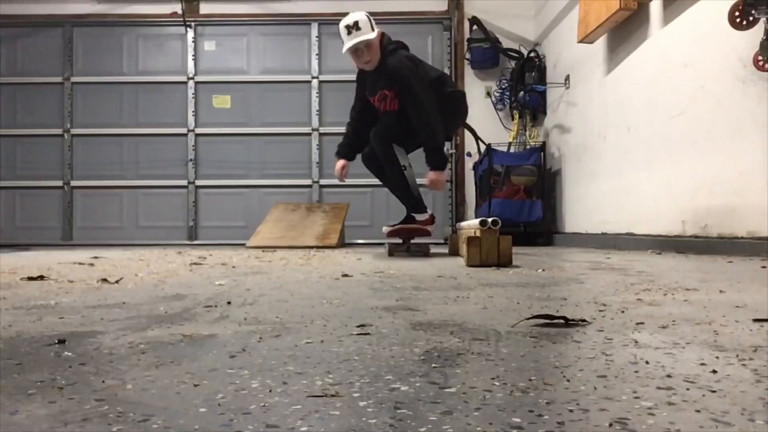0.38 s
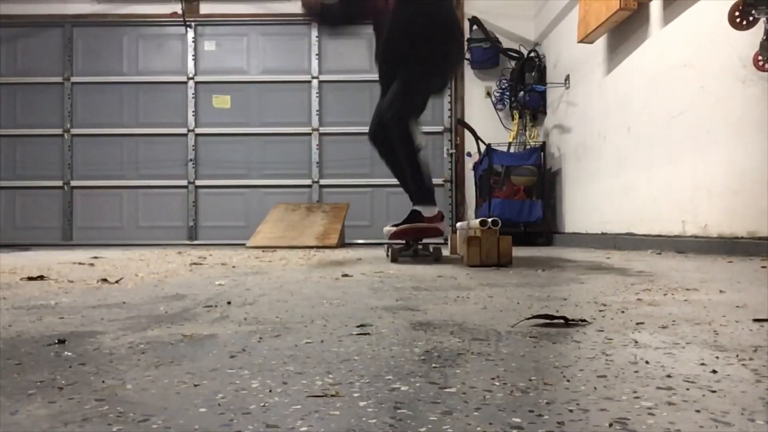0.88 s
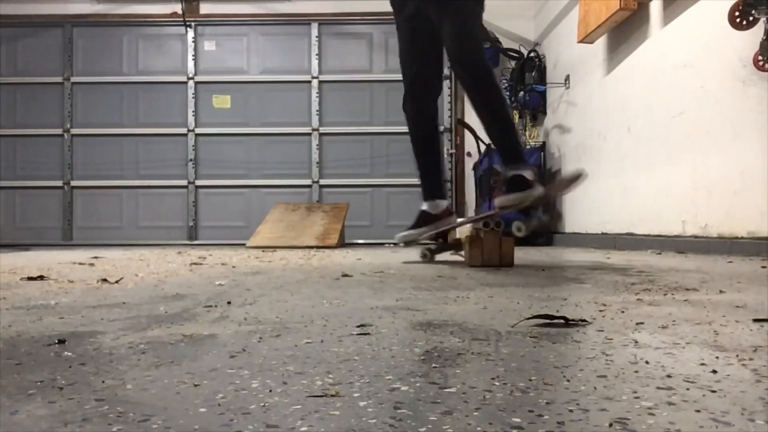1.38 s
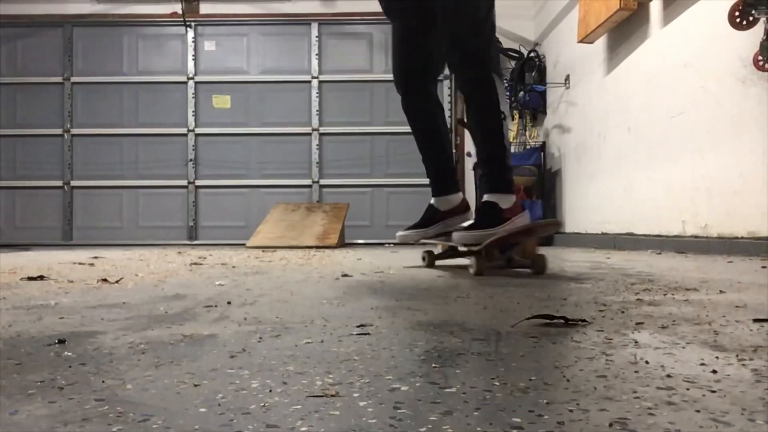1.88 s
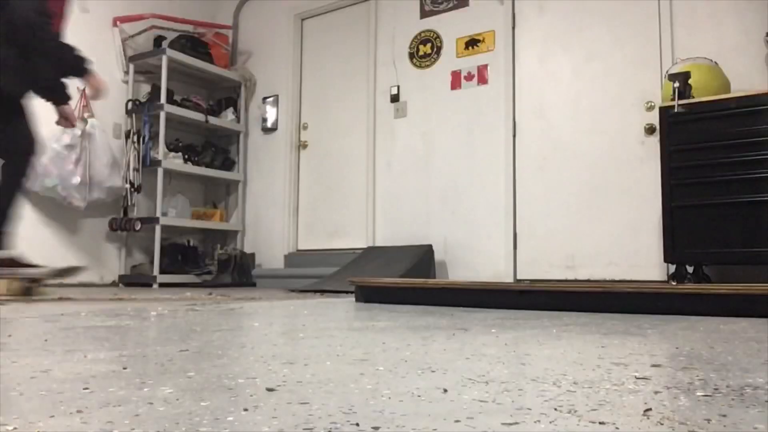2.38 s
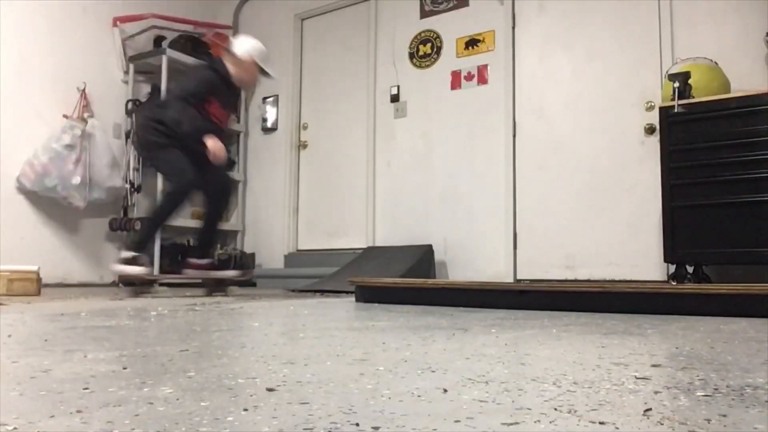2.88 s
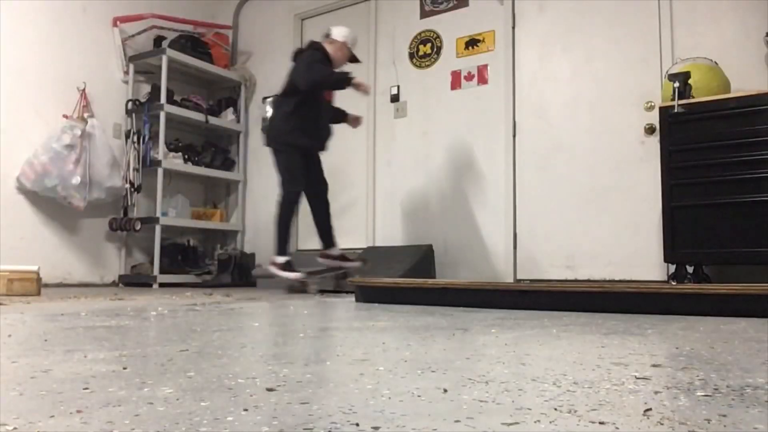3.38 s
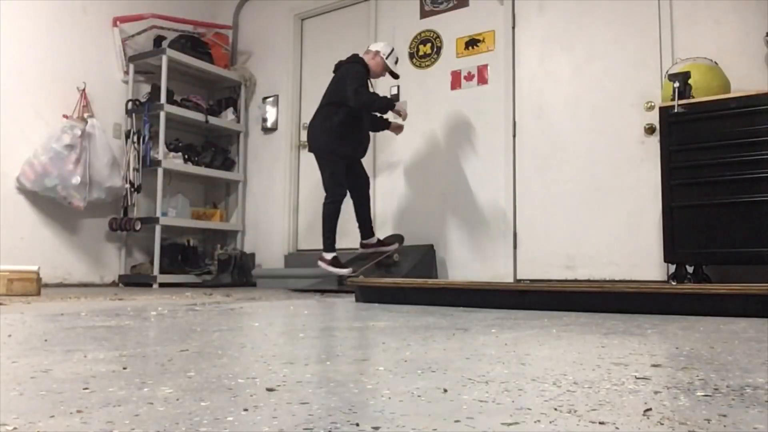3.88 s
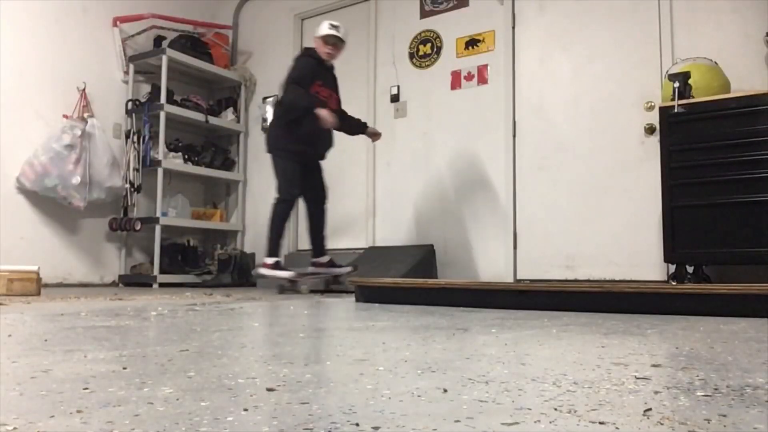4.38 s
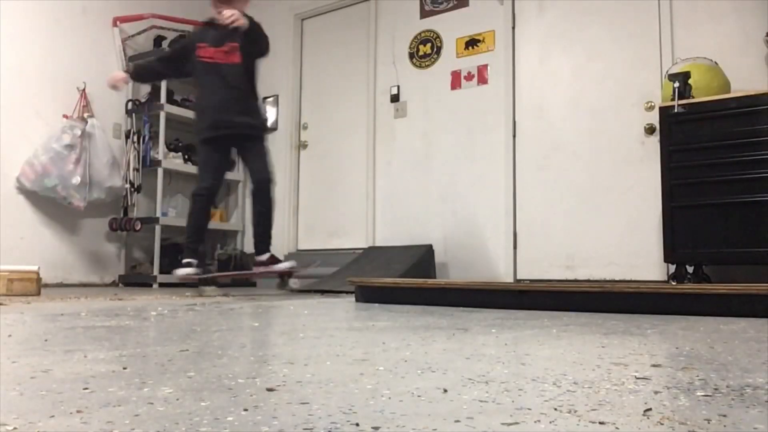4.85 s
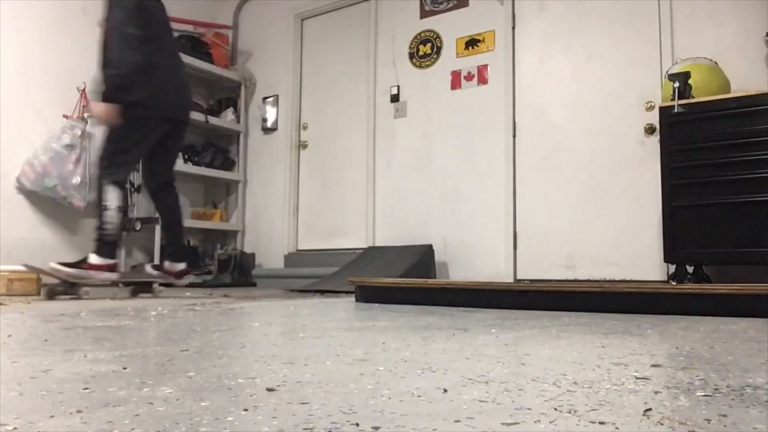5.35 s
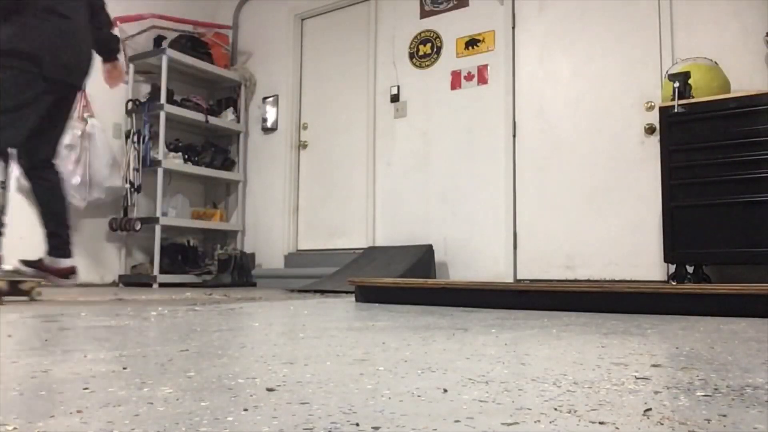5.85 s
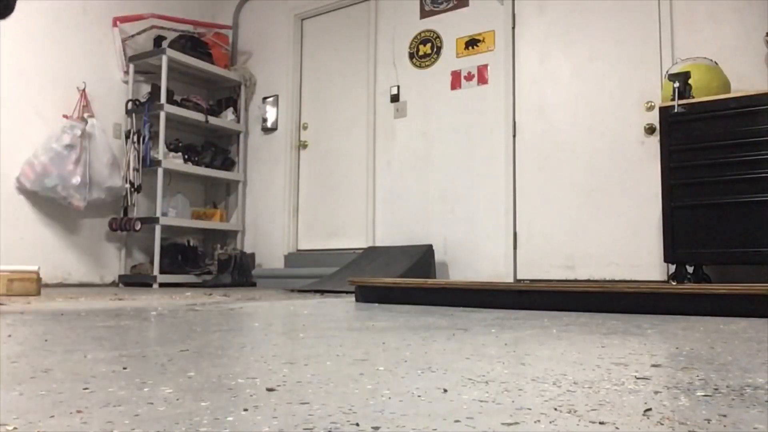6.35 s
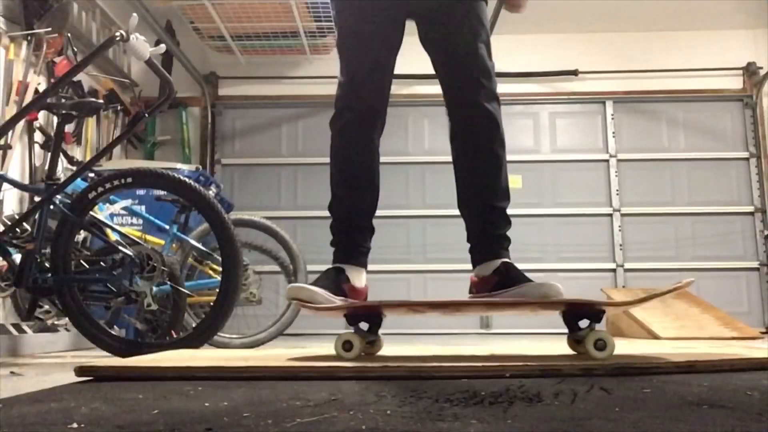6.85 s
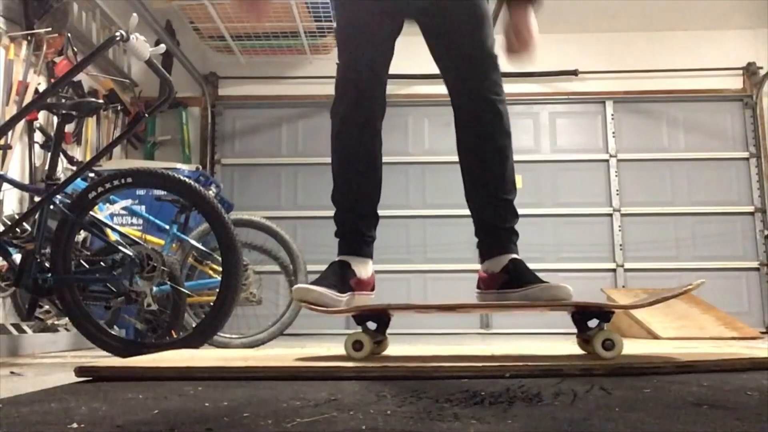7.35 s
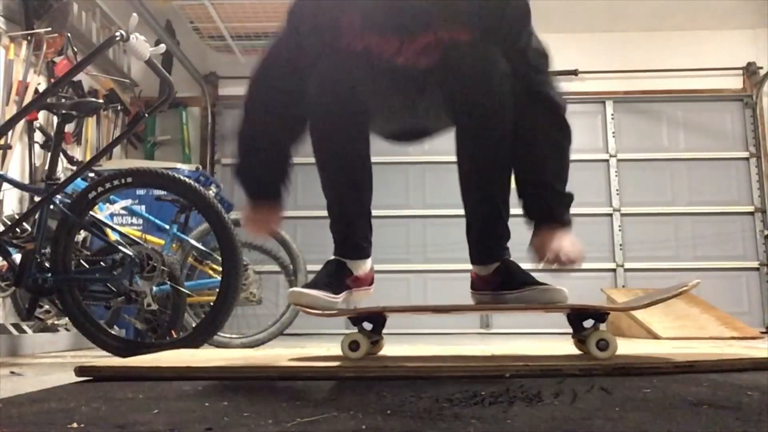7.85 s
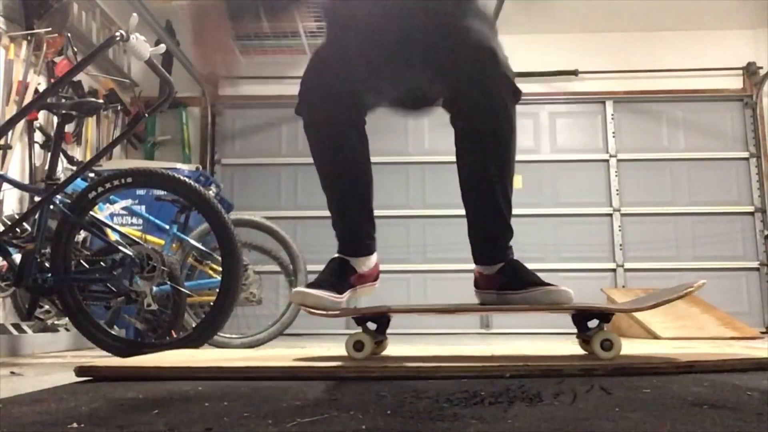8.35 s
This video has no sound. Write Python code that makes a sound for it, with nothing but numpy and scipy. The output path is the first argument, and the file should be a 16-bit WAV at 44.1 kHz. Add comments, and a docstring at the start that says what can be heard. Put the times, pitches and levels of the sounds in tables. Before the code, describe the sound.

A closed garage with short, dense echoes, microphone low and near the board; much of the action sounds slowed and muffled. From 0 to 1 s wheels rumble quietly, with tiny grit ticks near 0.3 and 0.8. A dull blow at 1.0 precedes a loud cracking slam at 1.3, then hollow woody knocks and scraping until 1.75. Rolling and a rough scrape swell around 2.2, easing before heavy ramp thumps crowd together at 3.2-3.45. After a lull near 4.0, low bumps and firm knocks return at 4.2-4.6. A brighter, ringing slap lands at 5.1, with brief scrapes. From 5.7 gritty wheels roll away over concrete, with a sharp clack at 6.4. After 6.6 it is nearly silent: soft plywood bumps, a faint thin sinking whine around 7.1-7.7, slight rubbing, and weak taps around 8.5 over faint hiss.

```python
"""A skateboard in a closed garage, in five settings, most of them slowed down, joined by fades.
In order: a slide over a rail box with ticks of grit, a ride up a wooden ramp, the drop back to the floor,
rolling away over concrete, and rocking on a plywood sheet, with a faint sinking whine.
Wheels are noise plus separate bumps; blows are noise bursts that ring on in random echoes;
hollow thumps are short decaying sines; a faint hiss lies under all."""
import sys
import numpy as np
from scipy import signal
from scipy.io import wavfile
from scipy.ndimage import uniform_filter1d

SR = 44100
rng = np.random.default_rng(int(sys.argv[2]) if len(sys.argv) > 2 else 0)


def inscribe(sig):
    """Save sig as 16-bit PCM at rate SR to the path in sys.argv[1].

    A 1-D sig is mono; a 2-D sig holds one channel per row.
    Samples are clipped to [-1, 1] before scaling.
    """
    pcm = np.round(np.clip(np.atleast_2d(sig).T, -1, 1) * 32767)
    wavfile.write(sys.argv[1], SR, pcm.astype(np.int16))


def makeup_ratio(level_db):
    """Linear amplitude ratio for a level in decibels (20 dB per factor of ten)."""
    decades = np.asarray(level_db, float) / 20
    return 10 ** decades


N = 384986


def board(setting, top_hz, colour, rings, under_deck_db, crack_top_db, details):
    """One setting: wheels, blows and their echoes drive each part of the range; details are added."""
    # parts, floor thud, deck, trucks, grit: low/Hz, high/Hz, blow length/s, direct blow/dB over its echoes
    parts = [(14.87, 167, 0.044, 28), (186.06, 860, 0.02, 26), (864, 3140, 0.0097, 28),
             (3180, 33000, 0.0062, 23.5)]
    # blows: t/s, deck/dB, floor thud/dB over deck, trucks/dB over deck, crack/dB
    blows = [(1.025, -29.5, 3.5, -6, -30), (1.309, -7, -4, -11, 16.5), (1.352, -9.5, 1.5, -13, -28),
             (1.43, -11.5, -2, -18, -20.5), (1.5528, -19.5, -28, -6.5, 3), (1.5938, -28, -12.5, -5, -11.5),
             (1.6571, -22.5, 6, -0.5, -20), (1.6866, -26, -7, -7, -8), (2.001, -37.5, 7, 7.5, -15),
             (3.192, -14, -6, -19.5, -35), (3.3498, -8.5, 0, -18.5, -16), (3.398, -8.5, 2.5, -19, -25),
             (3.434, -6.5, -5, -20, -35), (4.1965, -11, -3.5, -17, -29), (4.474, -11, -9, -18, -35),
             (4.5249, -12.5, -0.5, -18, -18), (4.7745, -48, -1, 8, -14), (5.0646, -28, -33, 0, -11),
             (5.086, -17, -7, -15, -30), (5.9172, -38, -20, 2, -28.5), (6.4215, -24, -14, 1, 6.5),
             (6.781, -39, 11, -12, -29), (7.692, -46.5, -24, -8.5, -20), (8.107, -50.5, -2, -8, -20),
             (8.17, -53.5, -30.5, -5.5, -19), (8.367, -61.5, -17, -7, -27), (8.5148, -43, -11, -15, -16.5),
             (8.5467, -40.5, -3.5, -5, -11)]
    blow_grit_db = -2.5  # over trucks
    scrape_wet = 0.26  # share of scrape power fed to the echoes
    crack_s, crack_rise_s = 0.0068, 0.0022

    start_s, end_s, fade_in_s, fade_out_s, slow, bumps_per_s, bump_share = setting
    t = np.arange(N) / SR
    out = np.zeros(N)
    in_setting = [row for row in blows if start_s <= row[0] < end_s]
    blow_s, deck_db, thud_db, trucks_db, crack_db = np.transpose(in_setting)
    blows_db = deck_db + [thud_db, 0 * blow_s, trucks_db, trucks_db + blow_grit_db]
    roll = rumble(t, under_deck_db)
    scrape = scraping(t, start_s, end_s)

    for k, (low_hz, high_hz, length_s, direct_db) in enumerate(parts):
        grain = wheels(bumps_per_s * 3 ** k, bump_share)  # finer grains higher up
        tail = garage(slow, length_s * 1.33)
        rolling = np.sqrt(roll[k] ** 2 + (1 - scrape_wet) * scrape[k] ** 2) * grain
        direct = bursts(blow_s, blows_db[k] + direct_db, length_s, length_s)  # heavy parts take time to move
        into_room = bursts(blow_s, blows_db[k], 1 / SR)
        into_room += np.sqrt(scrape_wet) * scrape[k] * grain / np.linalg.norm(tail)
        echoes = signal.oaconvolve(into_room, tail)[:N]
        out += signal.oaconvolve(rolling + direct + echoes, body(colour, rings, low_hz, high_hz))[:N]
    out = patchy(out) + details

    cracks = bursts(blow_s, crack_db, crack_s, crack_rise_s)  # the hard first contact
    crack_body = body([(800, 0), (9000, crack_top_db)], rings + rings, 459, 20000)  # each ring applied twice
    out += signal.oaconvolve(cracks, crack_body)[:N]

    out /= (1 + abs(out / .97) ** 4) ** .25  # the loudest swings bend over at a soft ceiling
    lowpass = signal.firwin(301, top_hz, window=("kaiser", 9), fs=SR)  # slowing lowers the top
    out = signal.oaconvolve(out, lowpass, "same")
    fade = np.clip(np.minimum((t - start_s) / fade_in_s, (end_s - t) / fade_out_s), 0, 1)
    return out * np.sin(np.pi / 2 * fade) ** 2


def rumble(t, under_deck_db):
    """Gain of thud, deck, trucks and grit in plain rolling; the brighter parts follow the deck."""
    # rolling: t/s, floor thud/dB, deck/dB
    roll_levels = [(0, -30, -29.5), (0.16, -36, -34.5), (0.75, -35.5, -33.5), (0.84, -30, -27),
                   (1.283, -42, -25), (1.498, -26, -16), (1.7, -21.5, -17.5), (1.982, -32.5, -27.5),
                   (2.303, -51, -22), (2.8, -36, -30), (3.17, -39, -25.5), (3.33, -39, -27),
                   (3.55, -24, -26.5), (3.92, -42, -44), (3.99, -32.5, -46.5), (4.15, -26, -34.5),
                   (4.45, -36, -25), (4.85, -48, -31), (5.04, -59, -39), (5.2, -43, -61),
                   (5.659, -37.5, -33.5), (5.739, -53, -31), (6.17, -44, -44), (6.25, -42.5, -29.5),
                   (6.651, -42, -40.5), (7.549, -54, -58.5), (8.05, -67, -63), (8.38, -56, -58.5),
                   (8.73, -40, -44)]
    s, thud_db, deck_db = np.transpose(roll_levels)
    thud_db = np.interp(t, s, thud_db)
    deck_db = np.interp(t, s, deck_db)
    return makeup_ratio([thud_db, deck_db, deck_db + under_deck_db[0], deck_db + under_deck_db[1]])


def wheels(bumps_per_s, bump_share):
    """Even grinding plus separate bumps of uneven size; bump_share is a share of power."""
    size = makeup_ratio(3.3 * np.minimum(rng.exponential(1, N), 4)) * rng.choice([-1., 1.], N)
    bumps = evened(size * (rng.random(N) < bumps_per_s / SR))
    grinding = rng.standard_normal(N)
    surge_db = 1.1 * evened(uniform_filter1d(rng.standard_normal(N), size=1200))  # rough and smooth patches
    return evened(makeup_ratio(surge_db) * (np.sqrt(1 - bump_share) * grinding + np.sqrt(bump_share) * bumps))


def scraping(t, start_s, end_s):
    """Gain of the four parts in the scrapes of wheels, trucks and shoes: only trucks and grit sound."""
    # scrapes: start/s, length before the stop/s, trucks/dB, grit/dB over trucks, drift by the end/dB
    scrapes = [(0.113, 0.66, -44, -1, -22), (0.778, 0.805, -40, -6.5, 8), (1.339, 0.45, -21.5, -10, -10),
               (2.019, 0.316, -42, -3, 16), (2.174, .2, -23, -7.5, 4.5), (2.423, 0.052, -34, -21, 2.5),
               (2.621, 0.21, -30, -7.5, -6.5), (3.155, 0.24, -30.5, -12.5, -3), (3.377, 0.14, -25, -11, -2),
               (5.068, 0.21, -32, -8.5, -7), (5.27, 0.11, -33, 3.5, -6), (5.671, 0.1, -34, -0.5, -6),
               (6.228, 0.154, -35, -11.5, -4.5), (6.44, 0.12, -39.5, 11, -10),
               (6.629, 0.356, -45, -3.5, -19), (7.646, 0.34, -57.5, -1, -10), (8.176, 0.29, -57.5, -6, -6),
               (8.594, 0.23, -44.5, -1, -8)]
    rise_s, stop_s = 0.0225, 0.0676
    power = np.zeros((4, len(t)))
    for s, length_s, trucks_db, grit_db, drift_db in scrapes:
        if not start_s <= s + rise_s < end_s:
            continue
        u = t - s
        gate = np.clip(np.minimum(u / rise_s, 1 + (length_s - u) / stop_s), 0, 1)
        level_db = trucks_db + drift_db * np.clip(u / length_s, 0, 1)
        power[2:] += (gate * makeup_ratio(level_db + [[0], [grit_db]])) ** 2
    return np.sqrt(power)


def bursts(times_s, levels_db, length_s, rise_s=.0001, size=4000):
    """A short noisy push of energy 1 at each time, scaled by its level."""
    t = np.arange(size) / SR
    out = np.zeros(N + size)
    for s, db, noise in zip(times_s, levels_db, rng.standard_normal((len(times_s), size))):
        push = noise * np.exp(-t / length_s * 2) * (1 - np.exp(-(t + 1 / SR) / rise_s))
        out[round(s * SR):][:size] += makeup_ratio(db) * push / np.linalg.norm(push)
    return out[:N]


def garage(slow, swell_s, spacing=10):
    """Sparse random-sign echoes that swell and die: deep bass fastest, low mids longest, treble before mids."""
    # decay of the room: f/Hz, t60/s before it is multiplied by slow
    decay = [(60, 0.14), (300, 0.83), (2000, 0.71), (5400, 0.36), (11000, 0.28)]
    taps = np.zeros(SR * 2)
    at = np.arange(0, len(taps), spacing)  # one echo in every stretch of this many samples
    signs = rng.choice([-1., 1.], len(at))
    taps[at + rng.integers(0, spacing, len(at))] = signs * np.sqrt(spacing)  # rms 1
    hz, t, z = signal.stft(taps, SR, nperseg=512)
    f, t60_s = np.transpose(decay)
    fall_db = -60 * t / slow / np.interp(hz, f, t60_s)[:, None]
    tail = signal.istft(z * makeup_ratio(fall_db), SR, nperseg=512)[1]
    return tail * (1 - np.exp(-np.arange(len(tail)) / SR / swell_s))


def body(colour, rings, low_hz, high_hz, size=8192):
    """Causal minimum-phase response of energy 1: colour and rings inside one part of the range."""
    hz = abs(np.fft.fftfreq(size, 1 / SR)) + 1
    f, db = np.transpose(colour)
    gain = makeup_ratio(np.interp(np.log(hz), np.log(f), db))
    for ring_hz, width_hz, ring_db in rings:
        gain *= 1 + (makeup_ratio(ring_db) - 1) / (1 + (2 * (hz - ring_hz) / width_hz) ** 2)
    ripple = evened(uniform_filter1d(rng.standard_normal(size), size=9))  # close room resonances
    mirrored = np.minimum(np.arange(size), size - np.arange(size))
    gain *= makeup_ratio(0.97 * ripple[mirrored])
    gain /= np.sqrt((1 + (low_hz / hz) ** 12) * (1 + (hz / high_hz) ** 12))
    log_gain = np.log(gain / gain.max() + 1e-5)
    taps = np.fft.ifft(np.exp(np.conj(signal.hilbert(log_gain)))).real[:size // 2]
    return taps / np.linalg.norm(taps)


def patchy(x):
    """Resonances come and go as the board moves: random patches some 40 ms by 500 Hz."""
    patch_db, full_hz = 2, 1500  # rms wander; less below full_hz
    hz, _, z = signal.stft(x, SR, nperseg=512)
    patches = uniform_filter1d(rng.standard_normal(z.T.shape), size=7, axis=0)
    patches = evened(uniform_filter1d(patches, size=6, axis=1).T)
    wander_db = patch_db * np.minimum(hz / full_hz, 1)[:, None] * patches
    return signal.istft(z * makeup_ratio(wander_db), nperseg=512)[1][:N]


def evened(x):
    """Scales to rms 1."""
    return x / np.sqrt(np.mean(x ** 2) + 1e-20)


def thumps():
    """Deck and plywood flex under the weight: each knock is one soft mode that swells and dies fast."""
    # knocks: t/s, level/dB before swell and decay, f/Hz
    knocks = [(1.078, -9.5, 203), (1.165, -10, 208), (1.314, -3, 352), (1.378, 1.5, 343.5),
              (1.457, 4.5, 357), (1.521, 0.5, 361), (1.56, -2, 340), (1.652, -2.5, 360.4),
              (1.755, -6.5, 334), (3.205, 0, 285), (3.365, 3, 118.8), (3.401, -0.5, 368),
              (3.95, -18.5, 149.7), (4.083, -9.5, 155), (4.218, -13, 566), (4.238, -6, 150),
              (4.484, -3.5, 647.3), (4.586, -1.5, 281.5), (5.107, -10.5, 170.7), (5.277, -15.5, 513),
              (6.786, -18, 99), (6.88, -22, 140), (7.127, -29, 157), (7.205, -29.5, 159),
              (8.365, -36, 68.6)]
    rise_s, t60_s, pitch_law = 0.011, 0.14, 0.16  # times at 300 Hz; higher is quicker by this power
    t = np.arange(SR // 2) / SR
    out = np.zeros(N + SR)
    for (s, db, hz), phase_turns in zip(knocks, rng.random(len(knocks))):
        u = t * (hz / 300) ** pitch_law
        envelope = (1 - np.exp(-u / rise_s)) * makeup_ratio(db - 60 * u / t60_s)
        out[round(s * SR):][:len(t)] += envelope * np.sin(2 * np.pi * (hz * t + phase_turns))
    return out[:N]


def ticks():
    """Grit snapping under a wheel: bright bursts with one blurred echo from the near wall."""
    # snaps: t/s, level/dB
    grit_snaps = [(0.3166, -13), (0.3884, -11), (0.8215, -11.5), (0.8679, -10.5), (1.4918, -11)]
    wall_s, wall_db = .018, -7  # echo delay, level over the snap
    s, db = np.transpose(grit_snaps)
    snaps = bursts(s, db, 0.0025) + bursts(s + wall_s, db + wall_db, 0.0265)
    return signal.oaconvolve(snaps, body([(5000, -19.5), (10000, -24.5)], [], 5800, 10500))[:N]


def whine():
    """A faint thin sine that swells and fades, wavers and sinks a little."""
    from_s, to_s, rms_db = 7.14, 7.68, -69  # rms at the height of the swell
    start_hz, sink_hz_per_s = 2800, 200
    t = np.arange(N) / SR - from_s
    waver_hz = uniform_filter1d(rng.normal(0, 700, N), size=250)
    turns = np.cumsum(start_hz - sink_hz_per_s * t + waver_hz) / SR
    swell = np.sin(np.pi * np.clip(t / (to_s - from_s), 0, 1))
    return makeup_ratio(rms_db) * np.sqrt(2) * swell * np.sin(2 * np.pi * turns)


def air():
    """Still air of the garage: faint even hiss of filtered noise."""
    # colour of the hiss: f/Hz, relative level/dB
    hiss_colour = [(300, -4), (1730, -10.5), (6680, -17.5), (9000, -33), (11700, -51)]
    level_db = -64.5
    return makeup_ratio(level_db) * signal.oaconvolve(rng.standard_normal(N), body(hiss_colour, [], 250, 12930))[:N]


def scene():
    """All five settings in a row, overlapping in their fades; one row of each table per setting."""
    # start/s, end/s, fade in/s, fade out/s, stretch of room decay, wheel bumps of lowest part/(1/s),
    # bump share of power/(0-1)
    settings = [(-.1, 2.2, .05, .05, 0.61, 47, 0.25), (2.197, 5.06, 0.049, 0.0034, 0.74, 55, 0.05),
                (5.053, 5.682, 0.0025, 0.00195, 1.83, 72, 0.04),
                (5.677, 6.605, 0.0027, 0.026, 1.12, 170, 0.08), (6.598, 8.9, 0.021, 0.051, 1.86, 44, 0.15)]
    # top of the sound: f/Hz
    tops_hz = [11950, 15800, 15800, 15800, 8900]
    # colour: f/Hz, relative level/dB
    colours = [
        [(30, -34), (62, -6.5), (130, -3), (290, -1.5), (355, 1), (666, -14), (1200, -24), (2300, -34.5),
         (6770, -36), (12400, -53.5)],
        [(30, -39), (114, 7), (183, -2.5), (286, -3.5), (662, -8), (1310, -20.5), (2000, -24.5), (3000, -28.5),
         (9110, -33), (15800, -46)],
        [(30, -37), (156, -3.5), (318, -12.5), (612, -13.5), (1060, -12.5), (3000, -18.5), (8640, -22),
         (15800, -33.5)],
        [(30, -103), (98, -38), (251, -12), (645, -19), (755, -13), (1570, -20.5), (15800, -31)],
        [(30, 4), (155, 3.5), (484, -5.5), (1880, -16.5), (3320, -17), (6310, -25.5), (8800, -40)],
    ]
    # ringing of the deck and the surface under it: f/Hz, width/Hz, level/dB over the colour
    ring_sets = [
        [(346.6, 36.2, 6), (1880, 550, 2.5), (2647, 67, 6.5)],
        [(146.4, 25, 4), (279, 12, 2.5), (650, 52, 2)],
        [(146, 22.6, 5), (587, 130, 8), (1770, 520, 5.5)],
        [(268, 110, 4), (864, 450, 0.5)],
        [(159.6, 35, 10), (302.5, 110, 6), (730, 125, 4.5), (1080, 160, 4.5)],
    ]
    # brighter parts in plain rolling: trucks/dB over deck, grit/dB over deck
    under_deck = [(-14, -23), (-11, -18), (-5, -12), (-9, -12.5), (-12, -36.5)]
    # crack at 9 kHz against 800 Hz: level/dB; the rail box cracks dullest, rolling over concrete brightest
    crack_tops_db = [-35, -25.5, -12, -1, -28]
    details = ticks() + whine() + air() + thumps()
    rows = zip(settings, tops_hz, colours, ring_sets, under_deck, crack_tops_db)
    return sum(board(*row, details) for row in rows)[None]


def band_limit(x):
    """A steep low-pass at the top of the band."""
    return signal.sosfilt(signal.butter(12, 16820, fs=SR, output="sos"), x)


def record(dry):
    """The finished mix as it is stored."""
    return band_limit(dry)


dry = scene()
out = record(dry)
inscribe(out)
```